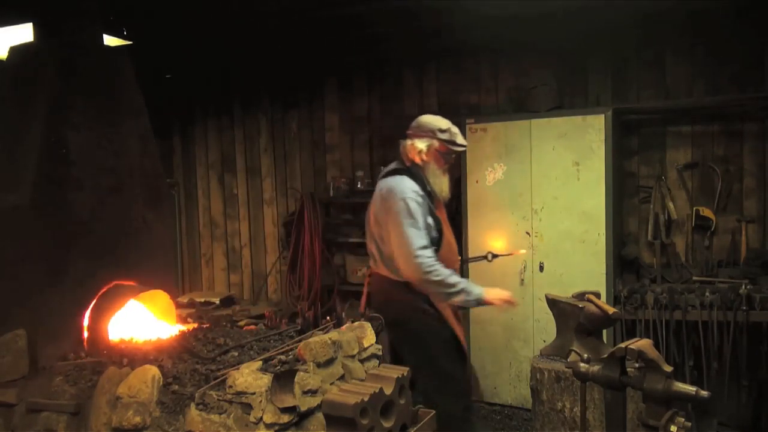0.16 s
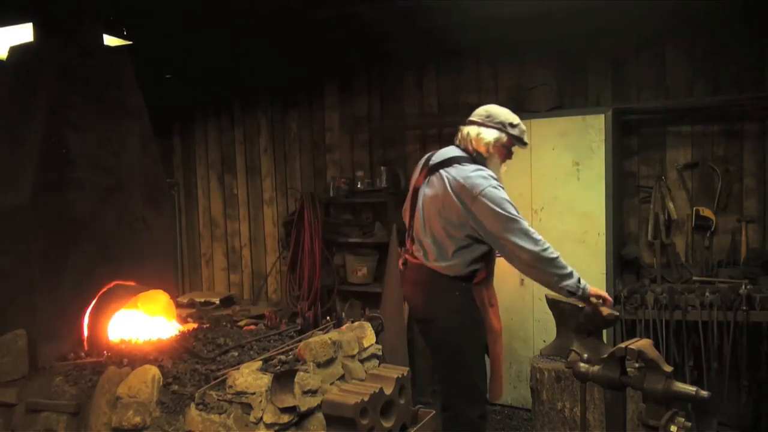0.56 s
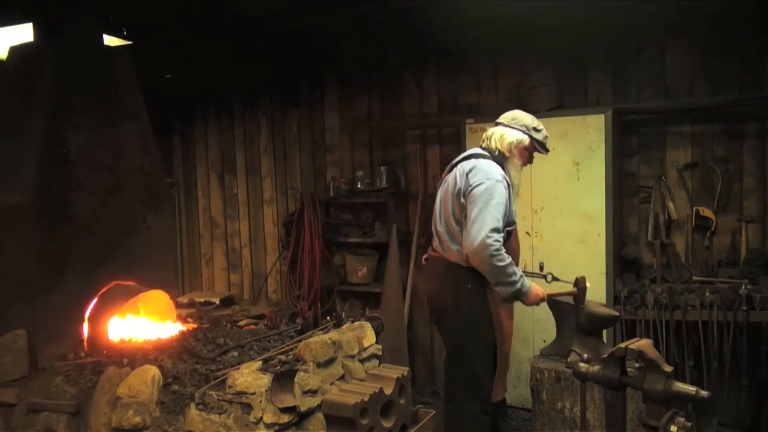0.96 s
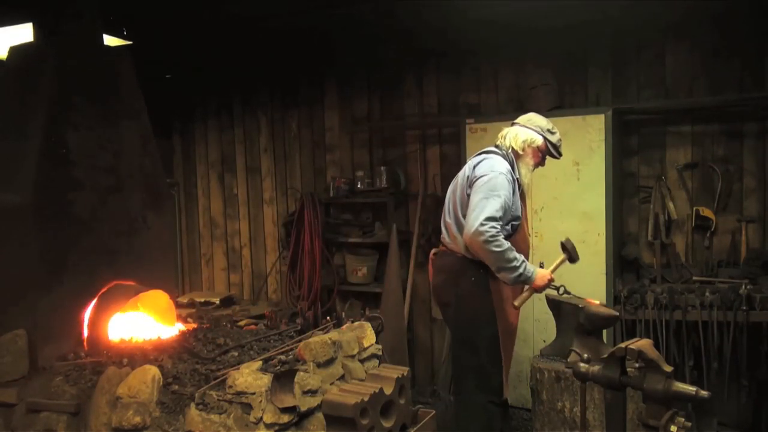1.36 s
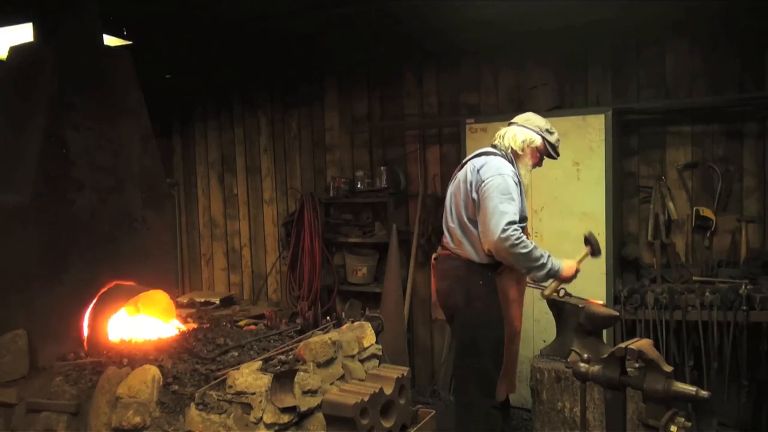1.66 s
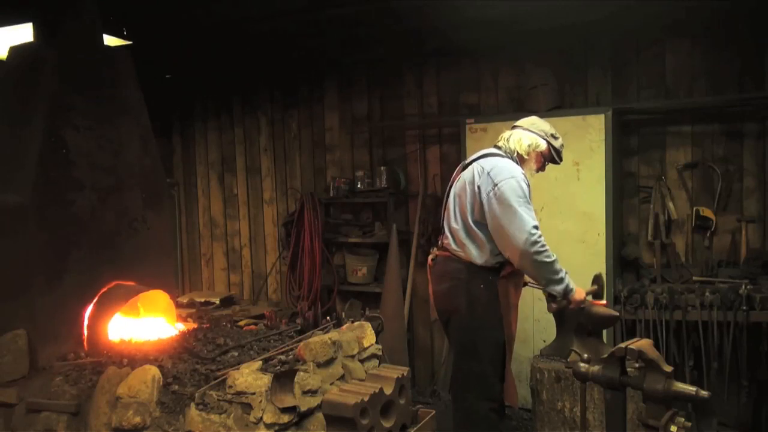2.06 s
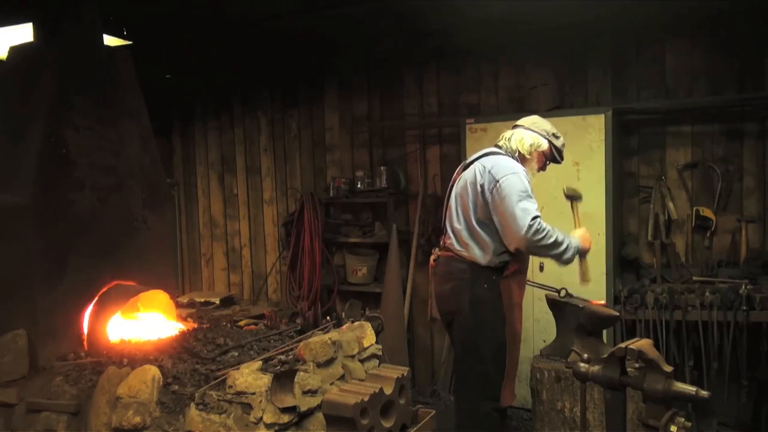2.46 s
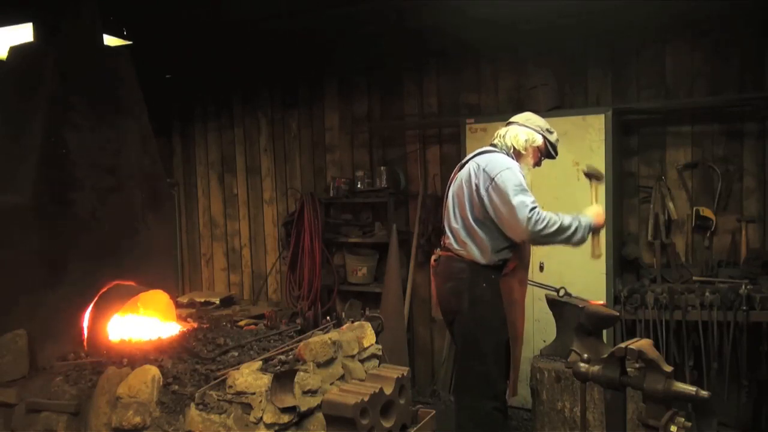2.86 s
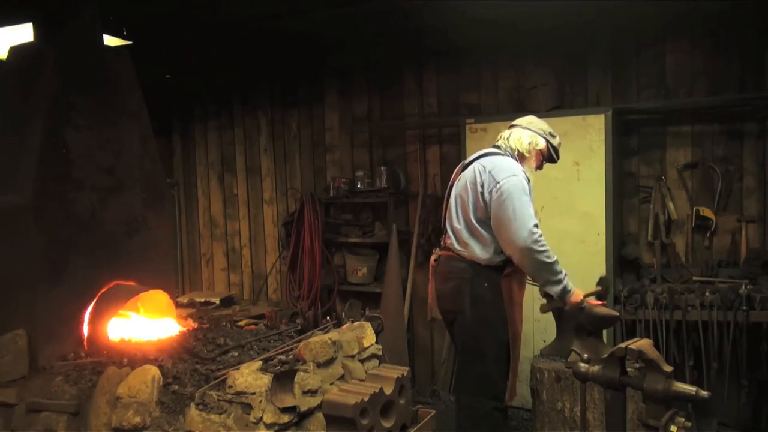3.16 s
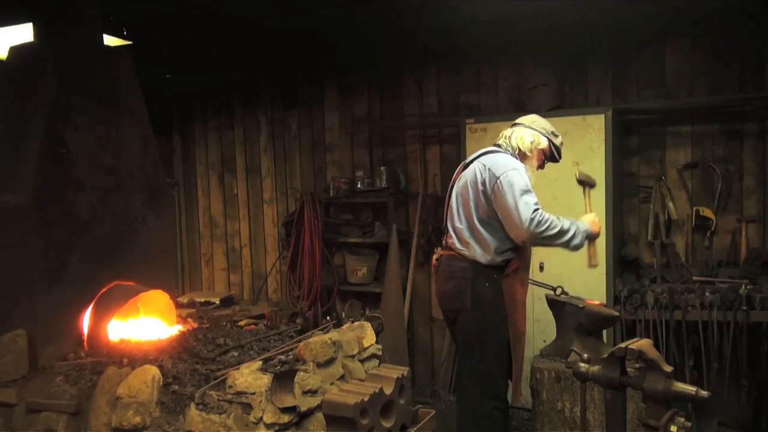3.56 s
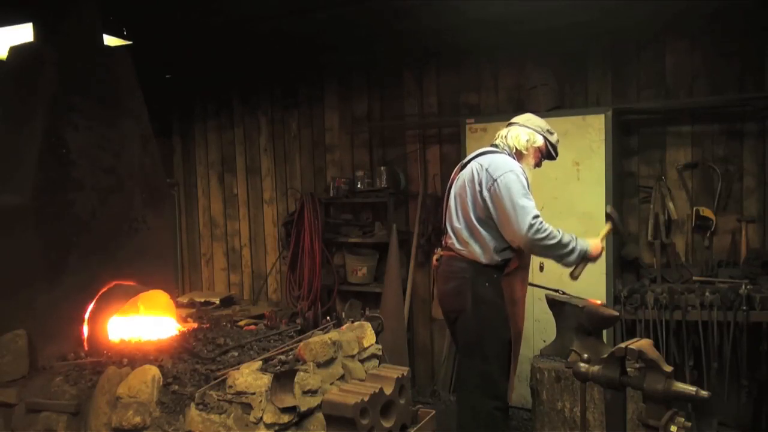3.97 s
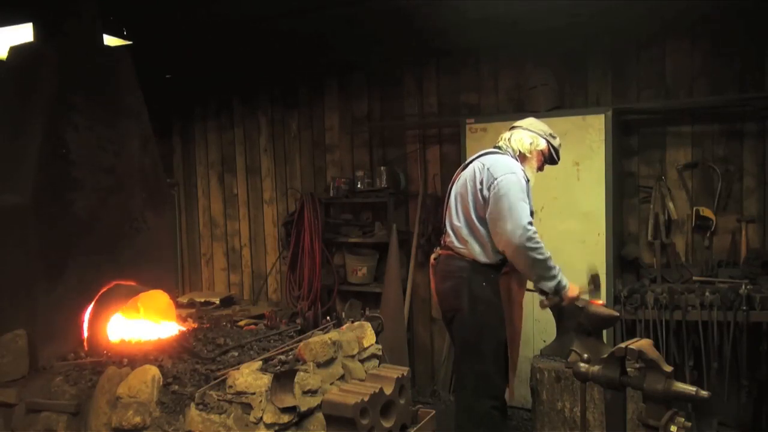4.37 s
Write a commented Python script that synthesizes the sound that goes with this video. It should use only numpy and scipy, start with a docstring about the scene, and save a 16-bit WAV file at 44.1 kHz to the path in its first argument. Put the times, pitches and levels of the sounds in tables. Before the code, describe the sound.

A smith walks to the anvil, irons and tongs clacking and scratching, with a single soft tap among them. After a short, nearly quiet pause come five strong, evenly spaced hammer strikes, distorted at impact, their metallic ringing fading between them. The forge fire murmurs low and faint behind. The room is a modest wooden workshop with close reflections, heard by a simple microphone whose automatic gain ducks and recovers.

```python
"""A smith steps up to his anvil in a wooden shop, over the soft rush of the forge fire: filtered noise.
As he lays hot iron on it and picks up his hammer, knocks sound as damped resonances, and grit scrapes in random grains.
Amid these comes one light blow; a faint gritty bed fades from just before the first hard blow.
Five hard blows follow: each is a noisy crack, a dull thud and a sum of ringing steel modes, echoed by the room.
The blows overload the microphone, and its gain control ducks and recovers."""
import sys
import numpy as np
from scipy import signal
from scipy.fft import rfft, irfft
from scipy.io import wavfile
from scipy.ndimage import uniform_filter1d

SR = 44100
rng = np.random.default_rng(int(sys.argv[2]) if len(sys.argv) > 2 else 0)


def master(y):
    """Save y as 16-bit WAV."""
    cut = np.clip(np.atleast_2d(y).T, -1, 1)
    pcm = np.round(cut * 32767)  # scale
    wavfile.write(sys.argv[1], SR, pcm.astype(np.int16))


N = 199266
TIME = np.arange(N) / SR


def from_db(db):
    """Decibels to gain."""
    return 10 ** (np.asarray(db) / 20)


def rms_one(x):
    """Scale to rms 1."""
    return x / np.sqrt(np.mean(x ** 2) + 1e-20)


def at_hz(points, hz):
    """Read a table on a log-frequency axis."""
    known_hz, values = np.transpose(points)
    return np.interp(np.log(np.maximum(hz, 1)), np.log(known_hz), values)


def fade(t, t60):
    """Exponential decay that starts at t = 0 and falls 60 dB in t60 seconds."""
    return (t >= 0) * np.exp(-np.log(1000) * np.maximum(t, 0) / t60)


def low_pass(x, hz, order=2):
    """Butterworth low-pass."""
    return signal.sosfilt(signal.butter(order, min(hz, .48 * SR), fs=SR, output="sos"), x + 1e-18)


def colour(x, spectrum, size=4096):
    """Causal (minimum-phase) filter of unit energy with the given spectrum."""
    hz = np.fft.rfftfreq(size, 1 / SR)
    cepstrum = irfft(np.log(from_db(at_hz(spectrum, hz))))
    # folding the cepstrum forward makes the filter minimum-phase
    cepstrum[1:size // 2] *= 2
    cepstrum[size // 2 + 1:] = 0
    response = irfft(np.exp(rfft(cepstrum)))
    return signal.fftconvolve(x, response / np.linalg.norm(response))[:len(x)]


def even_out(response, width_hz):
    """Level the broad humps of a random response and keep its fine ripple; unit energy."""
    bins = max(3, int(width_hz * len(response) / SR))
    power = uniform_filter1d(np.abs(rfft(response)) ** 2, bins)
    hz = np.fft.rfftfreq(len(response), 1 / SR)
    inverse_db = -10 * np.log10(power + 1e-12)
    even = colour(response, np.column_stack([hz, inverse_db])[1:])
    return even / np.linalg.norm(even)


def ring(t, hz, t60):
    """One struck mode: a decaying sine whose envelope starts at 1."""
    return np.sin(2 * np.pi * hz * t) * fade(t, t60)


def add(track, s, sound):
    """Mix a sound into a track at time s."""
    start = round(s * SR)
    track[start:start + len(sound)] += sound[:N - start]


def contact(t, crunch_t60, crunch_db):
    """A sharp click followed by a short noisy crunch, as of crumbling scale; unit energy."""
    crunch = rng.standard_normal(len(t)) * fade(t, crunch_t60)
    push = from_db(crunch_db) * crunch / np.linalg.norm(crunch)
    push[0] = 1
    return even_out(push, width_hz=600)


# Spectrum of the fire's rush. Each row: frequency in Hz, relative level in dB.
FORGE_SPECTRUM = [(15, -78.5), (25, -31.5), (42, -1), (87, 2.5), (242, 3), (309, -2), (335, 0), (516, -5),
                  (1100, -8), (1740, -13), (2220, -13.5), (6380, -23), (13600, -33), (16000, -46)]
FORGE_DB = -55


def forge():
    """The steady rush of the fire: noise through a filter that falls towards the treble."""
    return from_db(FORGE_DB) * colour(rng.standard_normal(N), FORGE_SPECTRUM)


# Reverberation of the shop. Each row: band centre in Hz, time to fall 60 dB in seconds.
SHOP_DECAY = [(100, 0.25), (400, 0.39), (1200, 0.34), (3000, 0.29), (6000, 0.32), (10000, 0.24),
              (15000, 0.25)]


def shop_response(early_db, early_s, tail_db, gap_s):
    """Direct sound, a cluster of near-wall reflections and a tail where each band dies at its own rate; unit energy."""
    t = TIME[:SR * 3 // 4]
    hz = np.fft.rfftfreq(len(t), 1 / SR)
    white = rfft(rng.standard_normal(len(t)))
    centres = [centre for centre, t60 in SHOP_DECAY]
    tail = np.zeros(len(t))
    # each band takes its share of one noise; neighbouring bands cross-fade
    for share, (centre, t60) in zip(np.eye(len(centres)), SHOP_DECAY):
        band = irfft(white * at_hz(list(zip(centres, share)), hz), len(t))
        tail += band * fade(t, t60)
    tail *= t > gap_s
    # sparse random reflections
    early = rng.standard_normal(len(t)) * (rng.random(len(t)) < .15)
    early *= (t > gap_s) * np.exp(-(t / early_s) ** 4)
    response = from_db(early_db) * early / np.linalg.norm(early)
    response += from_db(tail_db) * tail / np.linalg.norm(tail)
    response[0] = 1  # direct sound
    return even_out(response, width_hz=90)


def stroke(s, length_s, attack_s, release_t60):
    """Envelope that rises, holds and dies away."""
    rise = np.clip((TIME - s) / attack_s, 0, 1)
    return rise * fade(np.maximum(TIME - s - length_s, 0), release_t60)


# Soles and iron scraping, one row a stroke.
# Each row: start in seconds, length of rise and hold in seconds, level in dB.
SCRAPE_STROKES = [(0.025, 0.033, -41), (0.082, 0.015, -35), (0.116, 0.02, -33.5), (0.781, 0.13, -40),
                  (1.101, 0.088, -43.5), (1.355, 0.045, -39)]
# Spectrum of grit. Each row: frequency in Hz, relative level in dB.
GRIT_SPECTRUM = [(80, -11.5), (250, 4.5), (600, -1), (1200, -1), (2700, -6.5), (4500, -8.5), (7000, -13.5),
                 (10000, -18), (15500, -22)]
SCRAPE_ATTACK_S, SCRAPE_RELEASE_T60 = 0.016, 0.37
# a faint gritty bed that fades from just before the first hard blow
BED_DB, BED_FADE_S, BED_FADE_T60 = -51.5, 1.95, 1.9
# within a stroke: rate of the catches, their level and the level of the grit
CATCHES_PER_S, CATCH_DB, STROKE_GRIT_DB = 560, -1, -8.5


def scrapes(grains_per_s, spread_db):
    """Grit catches and lets go in grains of very uneven size, in each stroke and in a faint bed beneath."""
    spread = from_db(spread_db * np.minimum(rng.exponential(1, N), 4))
    sizes = spread * rng.standard_normal(N)
    grains = sizes * (rng.random(N) < grains_per_s / SR)
    grit = rms_one(colour(grains, GRIT_SPECTRUM))
    # firm strokes catch on the iron and take on its brighter colour
    catches = sizes * (rng.random(N) < CATCHES_PER_S / SR)
    iron = rms_one(colour(catches, KNOCK_SPECTRUM))
    strokes = sum(from_db(db) * stroke(s, length_s, SCRAPE_ATTACK_S, SCRAPE_RELEASE_T60)
                  for s, length_s, db in SCRAPE_STROKES)
    bed = from_db(BED_DB) * fade(np.maximum(TIME - BED_FADE_S, 0), BED_FADE_T60)
    return bed * grit + strokes * (from_db(STROKE_GRIT_DB) * grit + from_db(CATCH_DB) * iron)


# A footfall, then tongs and tools knocking. Each row: start in seconds, level in dB, resonance in Hz,
# resonance width in Hz, resonance boost in dB, cut-off in Hz,
# sharp tick in dB relative to the level (before its lift in the mix).
KNOCKS = [(0.0334, -20, 159, 19, 39, 9500, -20), (0.0645, -9.5, 690, 310, -5, 7800, -11),
          (0.083, -9.5, 980, 510, 10.5, 8000, -12), (0.1615, -0.5, 1230, 630, 9, 3700, 0),
          (0.213, -14, 1110, 300, 3, 10500, 0.5), (0.755, -9.5, 2210, 920, 5.5, 2540, -28),
          (0.8492, 0.5, 1430, 145, 11, 10900, -3), (1.1681, -15, 2770, 600, 3, 7400, -7),
          (1.364, -12.5, 2600, 600, -10, 6950, -26), (1.397, -2.5, 1780, 400, -4, 8000, -14)]
# Spectrum of the knocks, also heard in the scrapes. Each row: frequency in Hz, relative level in dB.
KNOCK_SPECTRUM = [(60, -16), (200, -0.5), (500, 5), (1300, 7.5), (2800, 7), (5000, 2.5), (9000, -6.5),
                  (15500, -35)]
# each knock rebounds once
REBOUND_S, REBOUND_DB = .008, -6


def knocks():
    """Clacks, each with one damped resonance and a rebound, and the sharp ticks of their first touch."""
    t = TIME[:SR // 4]
    clacks, ticks = np.zeros((2, N))
    tick = colour(1.0 * (t == 0), KNOCK_SPECTRUM)
    for s, db, hz, width_hz, boost_db, cut_hz, tick_db in KNOCKS:
        body = signal.iirpeak(hz, hz / width_hz, fs=SR)
        for lag_s, loss_db in ((0, 0), (REBOUND_S, REBOUND_DB)):
            clack = colour(contact(t, crunch_t60=0.007, crunch_db=8), KNOCK_SPECTRUM)
            resonance = from_db(boost_db) * signal.lfilter(*body, clack)
            add(clacks, s + lag_s, from_db(db + loss_db) * low_pass(clack + resonance, cut_hz))
        add(ticks, s, from_db(db + tick_db) * low_pass(tick, cut_hz))
    return clacks, ticks


def waver(t, hz, count=22):
    """Slow complex random drift, stronger for short waves up to 4 kHz."""
    knots = np.linspace(0, t[-1], count)
    real, imaginary = rng.standard_normal((2, count))
    return np.interp(t, knots, real + 1j * imaginary) * min(hz / 4000, 1)


def steel_mode(t, hz, t60, waver_depth, bloom, bloom_s):
    """A decaying tone that reflections build up, and that swells and sags at random as if the smith moved."""
    # bloom_s holds at 1750 Hz; higher modes build up faster
    build_up = 1 - np.clip(bloom, 0, 1) * np.exp(-t * hz / 1750 / bloom_s)
    swell = build_up * (1 + waver_depth * waver(t, hz))
    return np.imag(swell * np.exp(2j * np.pi * hz * t)) * fade(t, t60)


# Anvil modes. Each row: frequency in Hz, level in dB struck on the heel, in dB struck in the middle,
# in dB struck at the edge, time to fall 60 dB in seconds before the loss by grip.
ANVIL_MODES = [(1736.5, -17, -19.5, -19, .96), (1799.5, -16, -16.5, -24, .82), (1987, -12, -19, -15, .38),
               (2130, -16, -27, -14, .42), (3424, -25, -26, -48, .6), (4104, -23, -15.5, -23, .53),
               (4258, -21, -15, -15.5, .63), (4468, -41, -23, -29, .43), (4728, -38, -21, -22, .44),
               (4856, -40, -26, -17, .34), (5085, -36, -26, -22, .32), (5583, -42, -32, -22, .3),
               (7430, -60, -33, -34, .26), (7520, -60, -36, -31, .5), (8199, -60, -39, -24, .28),
               (8446, -60, -31, -36, .27), (12570, -58, -21, -28, .3)]
# iron pressed on the face: extra drive of the upper modes, and their extra loss
GRIP_DB, GRIP_LOSS_DB_PER_S = 7.5, 79.5


def anvil(t, ring_db, place, press):
    """The steel rings in many modes; the place struck sets their mix."""
    sound = np.zeros(len(t))
    for hz, *place_db, t60 in ANVIL_MODES:
        # iron pressed hard on the face drives the upper modes more and damps them sooner
        grip = np.clip(press, 0, 1) * np.clip(np.log2(hz / 2000), 0, 1)
        mode_db = ring_db + np.interp(place, np.arange(len(place_db)), place_db) + GRIP_DB * grip
        mode = steel_mode(t, hz, t60, waver_depth=.6, bloom=0.28, bloom_s=0.017)
        sound += from_db(mode_db - GRIP_LOSS_DB_PER_S * grip * t) * mode
    return sound


# Hammer on anvil. Each row: start in seconds, ring in dB, crack in dB (before the common lift),
# place from 0 heel over 1 middle to 2 edge and beyond, press from 0 to 1, hammer head ring in dB,
# slow pressure offset of the overloaded microphone in dB.
HAMMER_BLOWS = [(0.9562, -15, -17, 0.0, 0.87, -71, -74), (2.0845, -4.5, 1, 1.06, 0.62, -58.5, -13.5),
                (2.6069, -2, 1, 0.68, 0.39, -2, -12.5), (3.177, -3.5, 1.5, 0.77, 0.4, 3.5, -48),
                (3.7450, -3, 1.5, 2.5, 0.08, -4.5, -13), (4.405, -5.5, -2, 1.43, 0.64, -44, -17)]
# Hammer head modes. Each row: frequency in Hz, relative level in dB, time to fall 60 dB in seconds.
HEAD_MODES = [(11050, -6.5, 0.077), (11130, -23, 0.26), (10900, -33, .18)]
# Dull resonances of block, floor and room. Each row: frequency in Hz, level in dB relative to the unlifted crack,
# time to fall 60 dB in seconds.
DULL_MODES = [(191.3, -26.5, 0.24), (216.2, -28.5, 0.3), (387.3, -20.5, 0.076), (422.8, -17.5, .14),
              (474.5, -17, 0.066), (560, -28.5, 0.34), (591, -28.5, .18), (660, -22, 0.13),
              (743.5, -25, 0.24), (887, -17, .15), (1017, -33, 0.057), (1443, -19.5, 0.25),
              (1596, -26, 0.26)]
# Spectrum of the crack. Each row: frequency in Hz, relative level in dB.
CRACK_SPECTRUM = [(40, -20), (110, -6), (170, -8), (300, -5.5), (450, 0.5), (1000, -2), (1500, 2),
                  (2400, -2), (3500, -2.5), (4800, 2), (7000, -4), (10000, -9), (15500, -14.5)]
CRACK_LIFT_DB = 24
# cut-off of a full blow; below it the cut-off falls as a power of the force
CONTACT_HZ, CONTACT_POWER, FULL_BLOW_DB = 14000, 0.81, -3.5


def hammer():
    """Each blow gives a crack, a dull thud, the ring of anvil and hammer head, and a slow pressure offset."""
    t = TIME[:SR]
    cracks, rings, thuds, offsets = np.zeros((4, N))
    head = sum(from_db(db) * ring(t, hz, t60) for hz, db, t60 in HEAD_MODES)
    # neighbouring dull modes start in opposite directions
    thud = sum((-1) ** k * from_db(db) * ring(t, hz, t60) for k, (hz, db, t60) in enumerate(DULL_MODES))
    offset = -low_pass(fade(t, t60=.2), hz=60)
    for s, ring_db, crack_db, place, press, head_db, offset_db in HAMMER_BLOWS:
        add(rings, s, anvil(t, ring_db, place, press))
        add(rings, s, from_db(head_db) * head)
        # a soft contact sounds duller
        force = from_db(min(crack_db - FULL_BLOW_DB, 0))
        crack = low_pass(contact(t, crunch_t60=.02, crunch_db=-2.5), CONTACT_HZ * force ** CONTACT_POWER, order=4)
        add(cracks, s, from_db(crack_db) * crack)
        add(thuds, s, from_db(crack_db) * thud)
        add(offsets, s, from_db(offset_db) * offset)
    return from_db(CRACK_LIFT_DB) * colour(cracks, CRACK_SPECTRUM), rings, thuds, offsets


# level at which the ring of the steel feeds the room
RING_ROOM_DB = -14


def scene():
    """All sources in the shop; the ring comes mostly straight, and thuds, ticks and fire come wholly so."""
    shop = shop_response(early_db=9, early_s=0.015, tail_db=4.0, gap_s=0.0018)
    cracks, rings, thuds, offsets = hammer()
    clacks, ticks = knocks()
    scraping = scrapes(grains_per_s=1700, spread_db=4.5)
    sent = cracks + clacks + scraping + from_db(RING_ROOM_DB) * rings
    in_room = signal.fftconvolve(sent, shop)[:N]
    straight = rings + thuds + from_db(1.5) * ticks + forge()
    return (in_room + straight + offsets)[None]


def gain_control(x, threshold_db, attack_s, release_db_per_s):
    """The gain drops soon after a loud peak and creeps back."""
    over_db = np.maximum(20 * np.log10(np.abs(x) + 1e-9) - threshold_db, 0)
    # hold each peak, letting it fall at a steady rate
    creep_db = release_db_per_s * TIME
    held_db = np.maximum.accumulate(over_db + creep_db, axis=-1) - creep_db
    pole = np.exp(-1 / (attack_s * SR))
    return x * from_db(-signal.lfilter([1 - pole], [1, -pole], held_db))


CUTOFF_HZ = 15900


def record(dry):
    """Gain control, overload at full scale, a block against steady pressure, and a cut top."""
    controlled = gain_control(dry, threshold_db=8.5, attack_s=0.014, release_db_per_s=48)
    clipped = np.clip(controlled, -1, 1)
    coupled = signal.sosfilt(signal.butter(1, 1.5, "high", fs=SR, output="sos"), clipped)
    return signal.sosfilt(signal.ellip(10, .1, 70, CUTOFF_HZ, fs=SR, output="sos"), coupled)


dry = scene()
out = record(dry)
master(out)
```